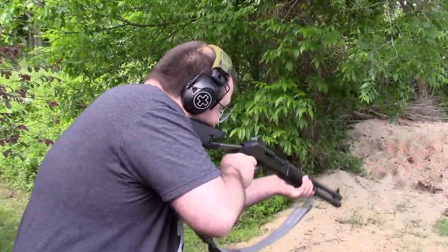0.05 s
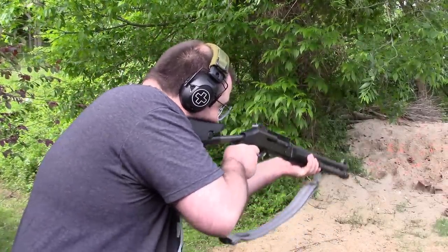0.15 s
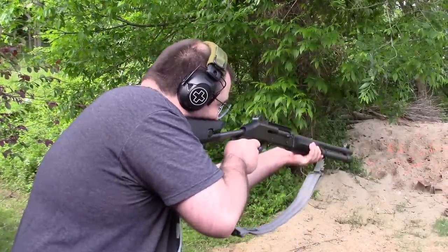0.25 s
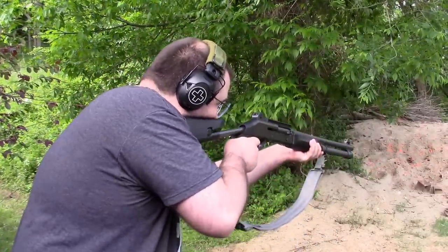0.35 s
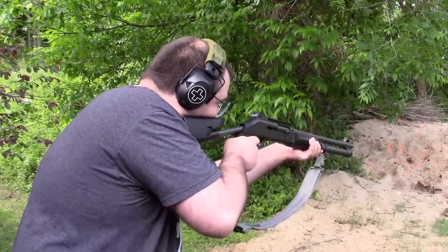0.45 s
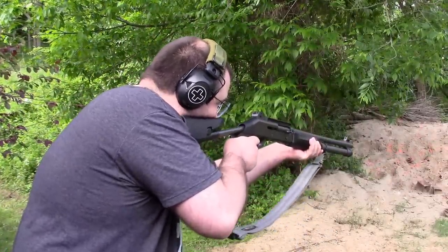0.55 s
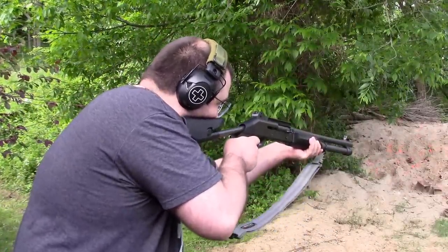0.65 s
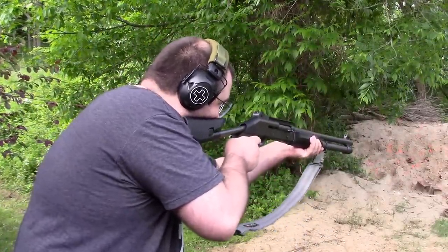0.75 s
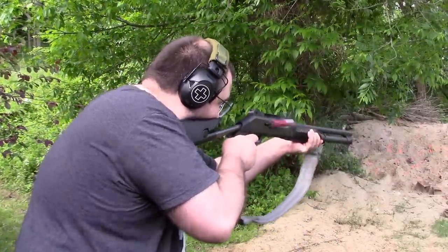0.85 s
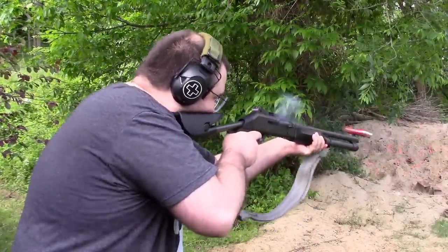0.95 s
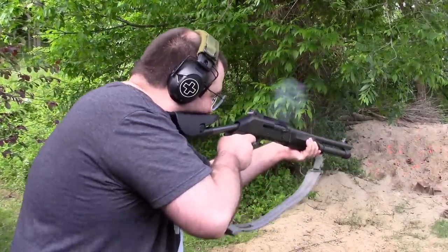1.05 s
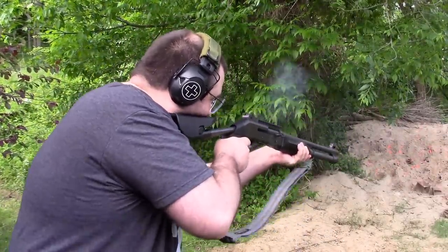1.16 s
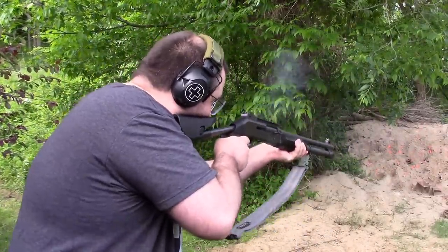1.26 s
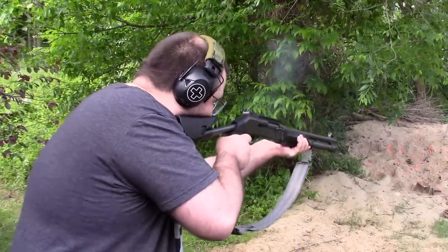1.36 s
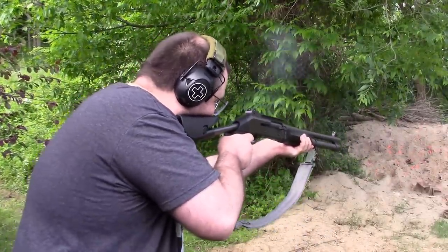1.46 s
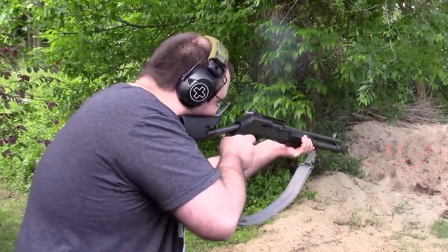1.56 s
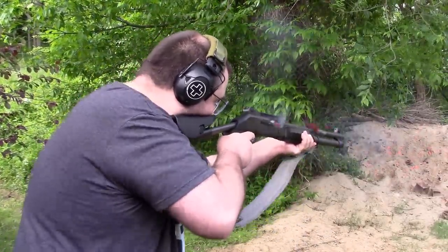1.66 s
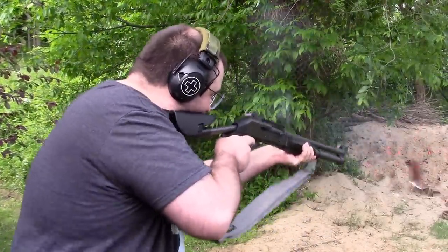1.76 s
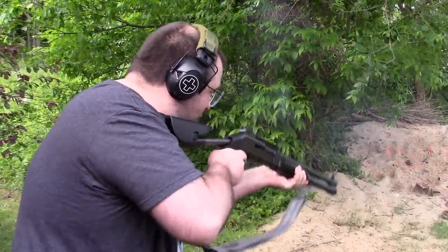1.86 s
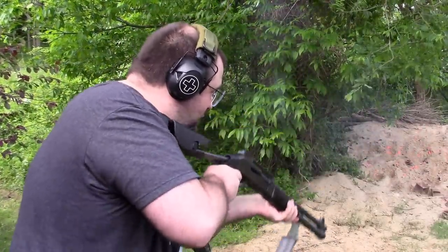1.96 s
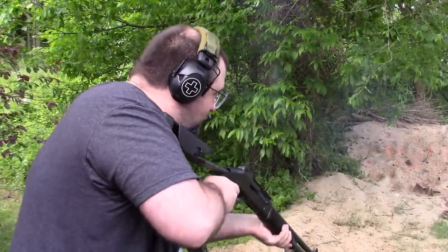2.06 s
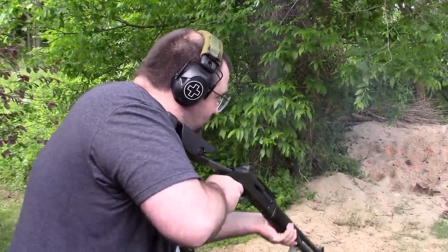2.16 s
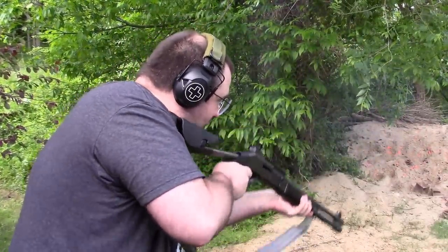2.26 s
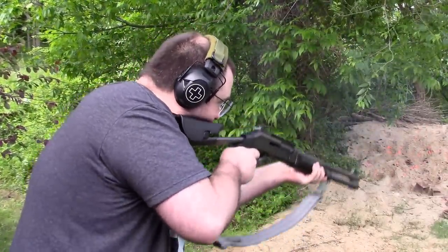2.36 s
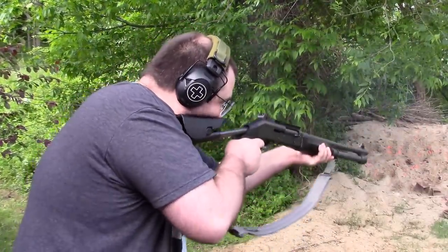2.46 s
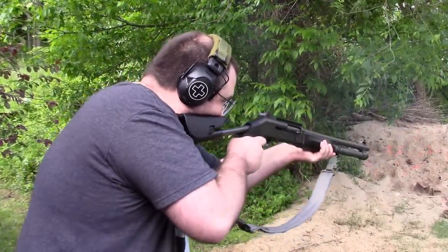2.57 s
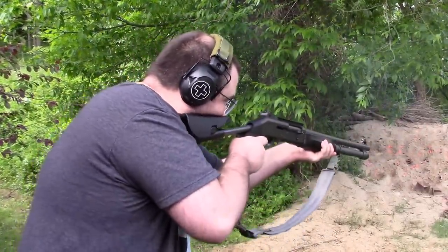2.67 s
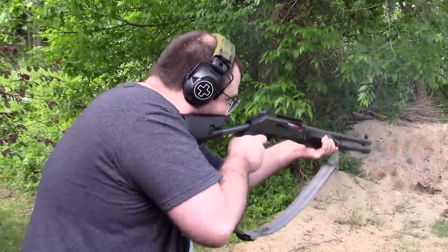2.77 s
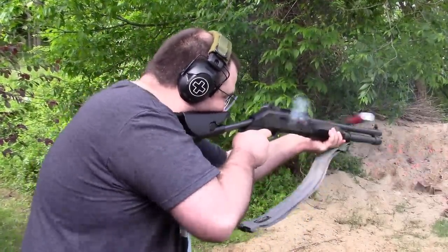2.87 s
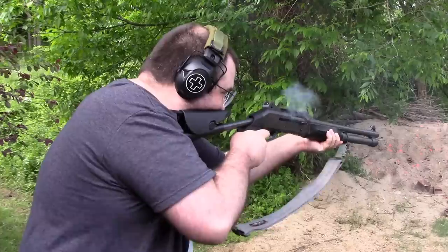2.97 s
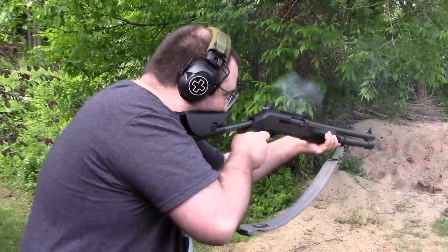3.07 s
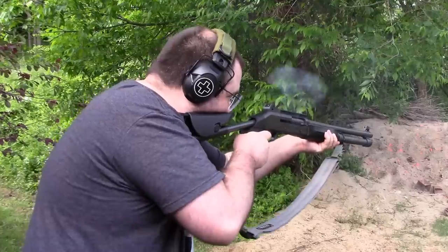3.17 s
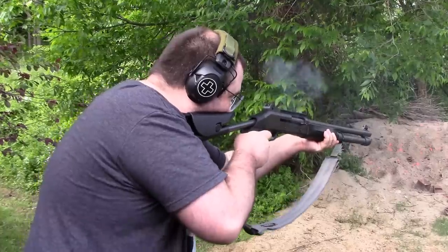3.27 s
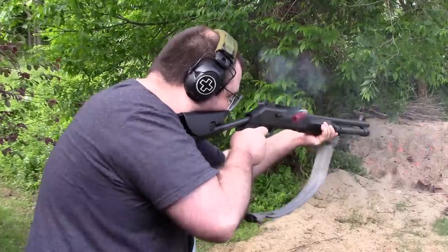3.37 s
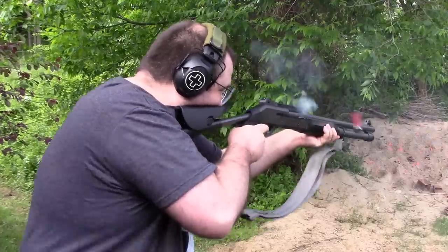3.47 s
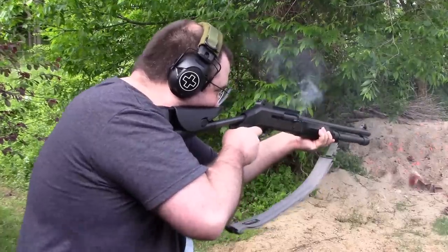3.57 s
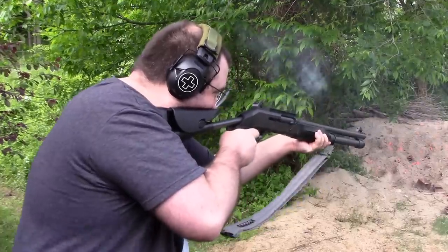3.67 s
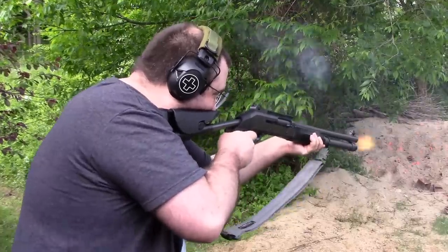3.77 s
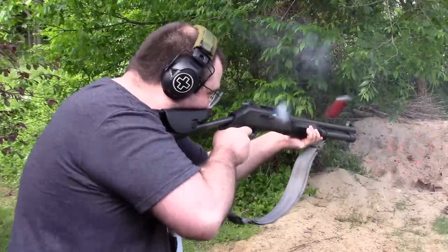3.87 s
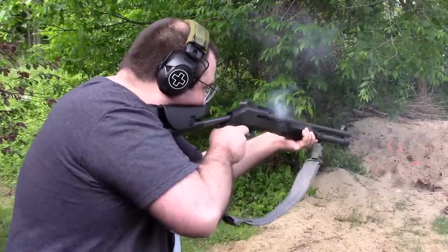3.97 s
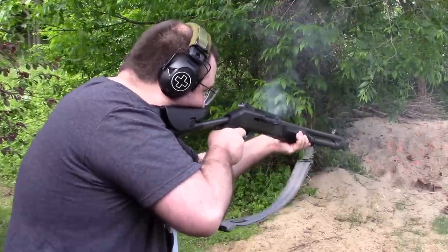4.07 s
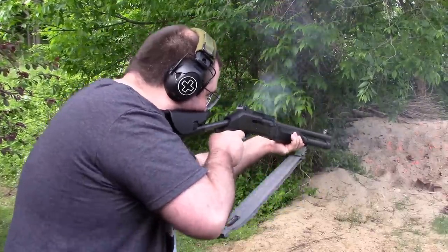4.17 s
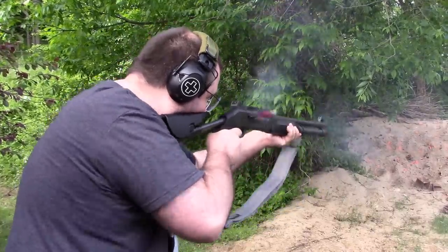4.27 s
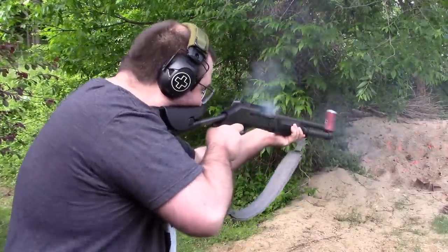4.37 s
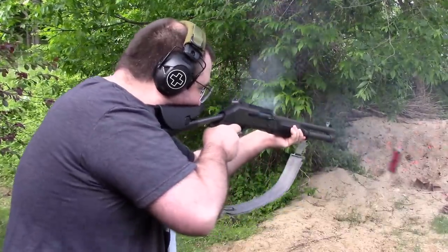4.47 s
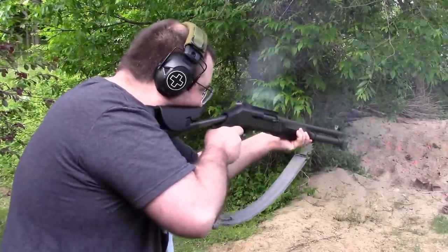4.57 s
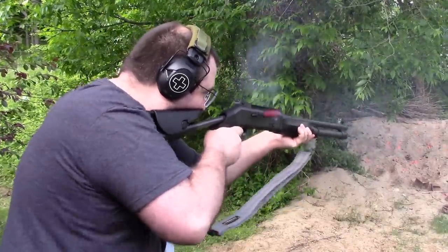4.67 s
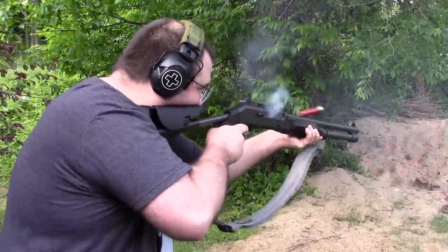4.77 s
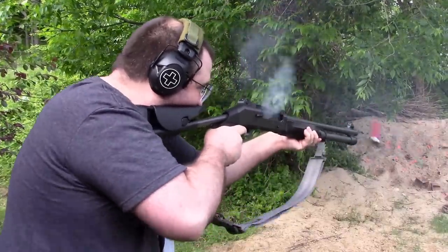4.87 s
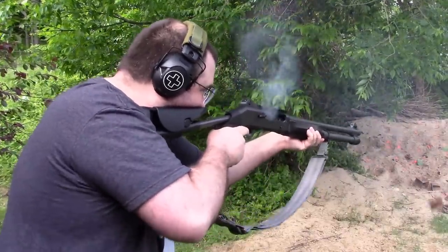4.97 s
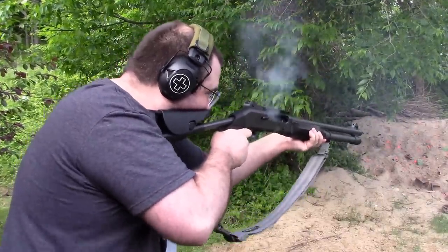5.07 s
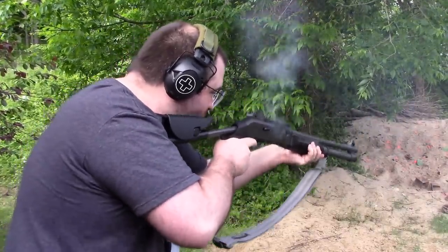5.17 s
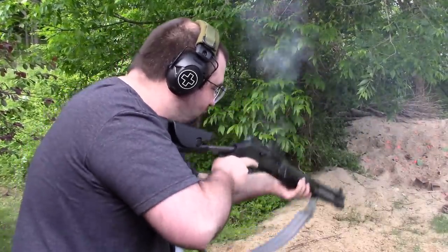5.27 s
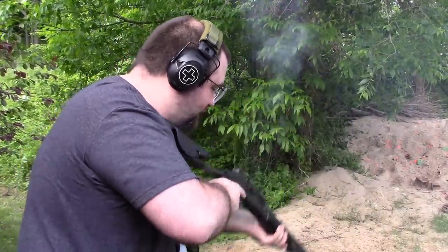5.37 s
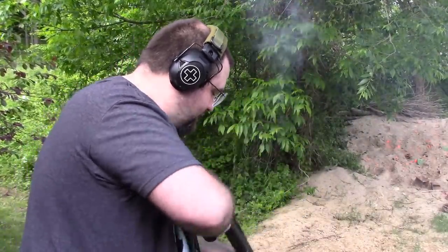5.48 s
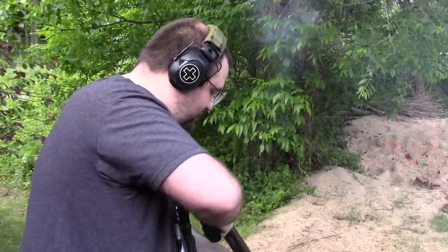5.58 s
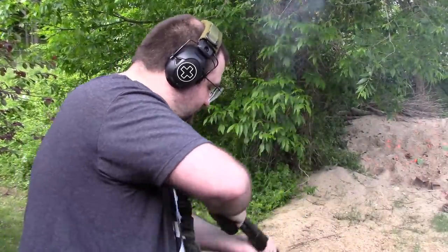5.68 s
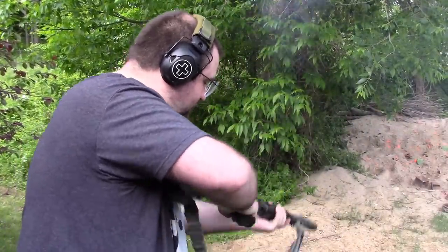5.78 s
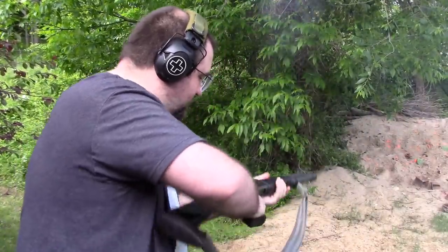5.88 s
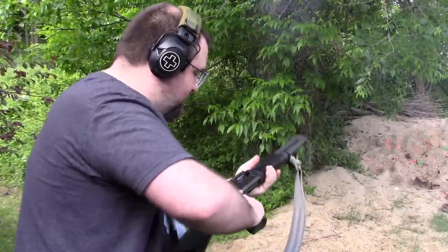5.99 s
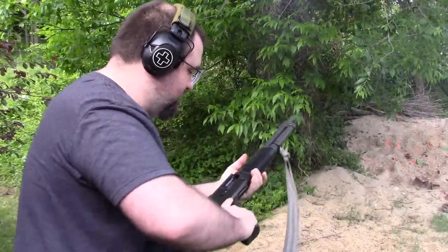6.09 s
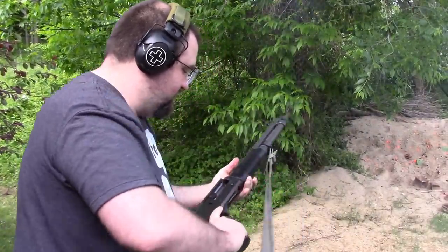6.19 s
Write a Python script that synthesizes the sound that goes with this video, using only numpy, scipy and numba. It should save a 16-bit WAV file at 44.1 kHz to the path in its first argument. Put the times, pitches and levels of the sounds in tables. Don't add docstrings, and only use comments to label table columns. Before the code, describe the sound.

Quiet low air and a faint plane drone, with webbing scraping cloth, then seven loud shotgun blasts close to a camera microphone. The first shots are separated, the last five come about half a second apart. Each cracks, holds as a dense roar thrown back by trunks and banks, and rolls away dully. Metallic bolt snaps and two shell clinks sit between; afterwards, thin rustling and tiny sling ticks.

```python
import sys
import numpy as np
from scipy import signal
from scipy.fft import rfft, irfft, next_fast_len
from scipy.io import wavfile
from scipy.ndimage import uniform_filter1d
from numba import njit

SR = 44100
rng = np.random.default_rng(int(sys.argv[2]) if len(sys.argv) > 2 else 0)


def unload_audio(sound):
    columns = np.transpose(np.atleast_2d(sound))
    steps = np.round(np.clip(columns, -1, 1) * 32767)
    wavfile.write(sys.argv[1], SR, steps.astype(np.int16))


def ratio(d):
    e = np.asarray(d, float) / 20
    return 10 ** e


N = 274743
TIME = np.arange(N) / SR

# start in seconds, how far the gain sags just after it in dB.
SHOTS = [
    (.86, -1),
    (1.6335, -3.5),
    (2.8098, -0.5),
    (3.3691, -2),
    (3.831, -2),
    (4.275, -1.5),
    (4.6981, -2),
]
# pitch in Hz, leak in dB, blast above the echoes in dB, settling in seconds.
MUZZLE = [(150, -42, 9, 0.0017), (600, -33, 7, 0.0017), (2500, -26, 2.5, 0.0092),
          (9000, -21.5, 14.5, 0.015), (15000, -23, 21, 0.025)]
# pitch in Hz, hold level in dB, hold in seconds, fade in dB per second, step at the last trunks in dB.
FOREST = [(150, -25.5, 0.31, 30, -5), (610, -18.5, 0.43, 42, -4), (2590, -20.5, .32, 45.5, -2),
          (9000, -29, 0.069, 58.5, 0.5)]
# pitch in Hz, level in dB.
FOREST_COLOUR = [(40, -24), (90, -10.5), (330, 3.5), (800, -1), (1250, 1), (1700, -2), (4000, 1), (8500, 4)]
# pitch in Hz, level in dB.
MIC_TOP = [(8500, 0), (12000, -8.5), (15500, -28)]
# time after the shot in seconds, half width in seconds, pitch in Hz, change in dB.
CLEARINGS = [(0.13, 0.043, 560, -5), (0.075, 0.034, 2100, -4), (0.303, 0.04, 120, -9),
             (0.27, 0.043, 2300, -4.5), (0.17, 0.054, 56, -10), (0.392, 0.029, 720, -4.5),
             (0.27, 0.088, 1740, 1.5)]
# time in seconds, peak in dB, pitch in Hz.
BANKS = [(.879, -4.5, 390), (.894, -5, 510), (.902, -0.5, 704), (1.066, -4.5, 494), (1.076, 2, 407),
         (1.091, -10, 410), (1.099, 3, 382), (1.122, -15, 350), (1.185, -23, 520), (1.196, -22, 800),
         (1.208, -7.5, 700), (1.2155, -7, 306), (1.2385, 1, 930), (1.2665, 3, 930), (1.284, -6.5, 360),
         (1.2925, -13, 440), (1.2975, -0.5, 470), (1.309, -3, 480), (1.3185, -16, 480), (1.326, -3.5, 414),
         (1.381, -8, 440), (1.401, -7, 1050), (1.4075, -1, 507), (1.447, -11, 503)]
# time in seconds, peak in dB, pitch in Hz.
BOOMS = [(1.065, -26, 150), (1.17, -19, 134), (1.241, -10.5, 250), (1.243, -5.5, 139), (1.247, -15, 90),
         (1.285, -18, 130), (1.34, -18, 129)]
# time after the shot in seconds, level in dB.
HILL = [(.5, -29), (.8, -43), (.88, -29.5), (.93, -38), (1.1, -41), (1.2, -54), (1.35, -49), (1.55, -78)]
# pitch in Hz, level in dB per Hz.
HILL_COLOUR = [(80, -17), (130, 4), (300, -9), (500, 9), (1350, 0.5), (1650, -23.5), (2500, -27),
               (5000, -71)]
# start in seconds, peak in dB.
BOLT = [
    (0.9908, 0.5),
    (1.758, 1),
    (2.9454, 2.5),
    (3.5039, 2),
    (3.9624, 5),
    (4.4006, 0.5),
    (2.979, -9),
]
# pitch in Hz, level in dB, time to fall 60 dB in seconds.
BOLT_MODES = [(5900, -8, .01), (8750, -19, .12), (10100, -12, .02), (14600, -14, .01)]
# start in seconds, peak in dB, crack in dB, brightness in dB per octave.
SHELLS = [
    (2.235, 7, -7, 0.5),
    (3.3336, 2.5, 12, 10),
]
# pitch in Hz, level in dB, time to fall 60 dB in seconds.
SHELL_MODES = [(1220, -4, 0.11), (2280, 1, 0.02), (2530, 2, 0.02), (2950, 0, 0.021), (3320, -4, .02),
               (3670, -6, 0.014), (4050, 2.5, 0.022), (4230, -2, 0.029), (5300, -12, .012),
               (6060, -7, .018), (6860, -8, .018)]
# start in seconds, peak in dB, pitch in Hz.
TICKS = [
    (1.26, -21, 6000),
    (1.3103, -20, 6030),
    (2.5614, -28, 8260),
    (2.6686, -29, 9000),
    (3.7632, -30, 5900),
    (5.38, -15.5, 6400),
    (5.4217, -15, 4130),
    (5.61, -24, 7300),
]
# time in seconds, level in dB.
SLING = [(0, -71), (.1, -61), (.22, -62), (.33, -61), (.4, -79), (.6, -80), (.72, -69), (.85, -58),
         (.9, -90)]
# pitch in Hz, level in dB per Hz.
SLING_COLOUR = [(1200, -16), (1900, -4), (2150, 7), (2500, -4), (2900, 3), (3400, -10), (4100, -7),
                (5500, -26)]
# time in seconds, level in dB.
LEAVES = [(0, -72), (.1, -68), (.45, -90), (1.4, -42), (2.3, -35.5), (2.8, -50), (5.4, -37), (5.7, -45.5),
          (6.23, -48)]
# pitch in Hz, level in dB per Hz.
LEAF_COLOUR = [(2060, -44), (3500, -2), (5310, -2), (5980, 1.5), (9020, -1.5), (10500, -3), (15500, -19)]
# time in seconds, level in dB, lift of the overtones in dB.
PLANE = [(0, -50, -18), (.1, -49, -6), (.3, -45.5, -12), (.5, -44.5, -5), (.85, -42, -2.5),
         (1.6, -29.5, -9.5), (2.8, -48.5, 9), (4, -70, 6)]
# multiple of the blade rate, level in dB.
BLADES = [(1, 1.5), (2, -3), (3, -7), (4, -17), (5, -11), (6, -15), (7, -28), (8, -21), (9, -24)]
# pitch in Hz, level in dB per Hz.
AIR_COLOUR = [(65, -30), (110, -4), (177, -1), (310, -4.5), (500, -8), (1590, -18), (9630, -36),
              (15500, -49)]
# time in seconds, gain in dB, wind guard in octaves above 100 Hz.
RECORDER = [(0, 4, 1.1), (.86, -1.5, 1.1), (1.6, 0.5, 1), (2.2, 0, 1.2), (2.9, -1.5, 0.96),
            (3.149, -7, 1.9), (3.4, -6, 2.28), (4.201, -6.5, 1.34), (4.55, -6, 2.2), (4.75, -3.5, 3.81),
            (4.95, -0.5, 4.29), (5.2, -1.5, 4.44), (5.5, -5, 3.94), (5.8, 0, 3.77), (6.23, -2.5, 2.7)]

LEAK_S = 0.0067
EDGE_S, EDGE_SOFT_S = 0.48, 0.004
KNEE_S, LATE_DB_PER_S = 0.92, 13.5
CLEARING_OCT = 1.46
DUCK_DB, RECOVER_S, SAG_S = 27, 1, 0.1
REBOUND_S, REBOUND_DB = 0.0068, -1
BLADE_HZ = 88.7
CRACK = signal.butter(2, [3000, 9500], "band", fs=SR, output="sos")


def on_log(hz, table):
    f, v = np.transpose(table)
    return np.interp(np.log(hz + 1e-9), np.log(f), v)


def add(out, s, sound):
    i = int(s * SR)
    out[..., i:i + sound.shape[-1]] += sound[..., :out.shape[-1] - i]


def recovered_db(since):
    return -DUCK_DB * np.clip(1 - since / RECOVER_S, 0, 1) * (since >= 0)


def blasts():
    size = next_fast_len(int(1.6 * SR))
    t, hz = TIME[:size], np.fft.rfftfreq(size, 1 / SR) + 1e-9
    same = np.clip(on_log(hz, [(200, .95), (1000, .75), (3000, .2)]), 0, 1)
    side_db = on_log(hz, [(150, -21), (350, -29), (1000, -21), (4000, -17), (8000, -18), (12000, -14)])
    side_gain = ratio(side_db + 1.5)
    bands = []
    for centre in 40 * 2 ** np.arange(0, 9, .5):
        level_db = forest_db(t, centre) + on_log(centre, FOREST_COLOUR) + on_log(centre, MIC_TOP)
        gain = ratio(level_db) * np.sqrt(SR / 2 / (0.21 * centre))
        bands.append((centre, gain))
    fixed = trunks(size, 5000, 1.)
    strong = banks(size)
    out = np.zeros((2, N))
    for k, (s, _) in enumerate(SHOTS):
        wave = same * fixed + np.sqrt(1 - same ** 2) * trunks(size, SR, 1.5)
        wave[1] *= side_gain
        answer = strong + hillside(wave, t, hz)
        for centre, gain in bands:
            band = np.clip(1 - abs(2 * np.log2(hz / centre)), 0, 1)
            answer = answer + gain * irfft(wave * band, size)
        mid, side = answer
        duck_db = sum(recovered_db(t + s - later) for later, _ in SHOTS[k + 1:])
        add(out, s, np.array([mid + side, mid - side]) * ratio(duck_db))
    return out


def forest_db(t, hz):
    def at(table):
        columns = np.array(table)
        return [on_log(hz, columns[:, [0, k]]) for k in range(1, columns.shape[1])]

    hold_db, hold_s, fade, edge_db = at(FOREST)
    leak_db, blast_db, settle_s = at(MUZZLE)
    db = hold_db - fade * (np.clip(t, hold_s, KNEE_S) - hold_s)
    db = db - LATE_DB_PER_S * np.maximum(t - KNEE_S, 0)
    db = db + edge_db * (1 + np.tanh((t - EDGE_S) / EDGE_SOFT_S)) / 2
    db = db + blast_db * np.exp(-np.abs(t - LEAK_S) / settle_s)
    for s, half_s, gap_hz, gap_db in CLEARINGS:
        octaves = np.log2(hz / gap_hz)
        db = db + gap_db * np.exp(-((t - s) / half_s) ** 2 - (octaves / CLEARING_OCT) ** 2)
    return np.where(t < LEAK_S, leak_db, db)


def trunks(size, per_s, lumpy_db):
    x = rng.standard_normal((2, size)) * ratio(lumpy_db * rng.exponential(size=(2, size)))
    x = x * (rng.random((2, size)) < per_s / SR)
    return rfft(x / x.std())


def pulse(hz, cycles):
    t = np.arange(-2 * cycles, 2 * cycles, hz / SR)
    return np.exp(-2 * (2 * t / cycles) ** 2) * np.cos(2 * np.pi * t + 1.0)


def banks(size):
    out = np.zeros((2, size))
    for rows in (BANKS, BOOMS):
        for s, peak_db, hz in rows:
            p = ratio(peak_db) * pulse(hz, 3.)
            off_centre = .07 * rng.standard_normal()
            add(out, s - SHOTS[0][0] - len(p) / SR / 2, np.outer([1, off_centre], p))
    return out


def hillside(wave, t, hz):
    far = irfft(wave * ratio(on_log(hz, HILL_COLOUR)), len(t))
    return far / far[0].std() * ratio(np.interp(t, *np.transpose(HILL), left=-99))


def ring(modes, crack_db, crack_s):
    t = TIME[:SR // 4]
    y = ratio(crack_db) * signal.sosfilt(CRACK, rng.standard_normal(len(t))) * np.exp(-t / crack_s)
    for hz, db, t60 in modes:
        size, phase = rng.standard_normal(2)
        y = y + ratio(db + 1.5 * size - 60 * t / t60) * np.sin(2 * np.pi * hz * t + phase)
    return y / np.abs(y).max()


def bolt(out):
    for s, db in BOLT:
        for late_s, late_db in ((0, 0), (REBOUND_S, REBOUND_DB)):
            add(out, s + late_s, ratio(db + late_db) * ring(BOLT_MODES, 8., .003))


def shells(out):
    for s, db, crack_db, tilt_db in SHELLS:
        modes = []
        for hz, mode_db, t60 in SHELL_MODES:
            modes.append((hz, mode_db + tilt_db * np.log2(hz / SHELL_MODES[3][0]), t60))
        add(out, s, ratio(db) * ring(modes, crack_db, .003))


def sling_ticks(out):
    for s, db, hz in TICKS:
        modes = [(hz, 0, .006), (1.45 * hz, -2, .005), (2.1 * hz, -2, .005)]
        add(out, s, ratio(db) * ring(modes, 4., .0012))


def metal():
    out = np.zeros(N)
    bolt(out)
    shells(out)
    sling_ticks(out)
    t = TIME[:SR // 5]
    mid, side = rng.standard_normal((2, len(t))) * ratio(-37.0 - 60 * np.abs(t - .02) / 0.1)
    smear = mid + 0.34 * side * np.array([[1], [-1]])
    return out + signal.fftconvolve(out[None], smear, axes=1)[:, :N]


def coloured(table, side_db):
    gain = ratio(on_log(np.fft.rfftfreq(N, 1 / SR), table))
    mid, side = irfft(rfft(rng.standard_normal((2, N))) * gain, N)
    return (mid + ratio(side_db) * side * np.array([[1], [-1]])) / mid.std()


def sling():
    return coloured(SLING_COLOUR, -18.0) * ratio(np.interp(TIME, *np.transpose(SLING), right=-99))


def leaves():
    return coloured(LEAF_COLOUR, -11.0) * ratio(np.interp(TIME, *np.transpose(LEAVES)))


def plane():
    s, db, lift_db = np.transpose(PLANE)
    out = 0
    for k, (_, line_db) in enumerate(BLADES, 1):
        waver = uniform_filter1d(np.repeat(rng.standard_normal(N // 4000 + 1), 4000), 4000)[:N]
        lift = np.interp(TIME, s, lift_db) * (k > 1)
        level_db = line_db - BLADES[0][1] + lift + 1.7 * waver * np.sqrt(k)
        out = out + ratio(level_db) * np.sin(2 * np.pi * k * BLADE_HZ * TIME + k ** 2)
    return np.sqrt(2) * out * ratio(np.interp(TIME, s, db))


def air():
    return coloured(AIR_COLOUR, -12.0) * ratio(-56.5 + 3.0)


def scene():
    calm = sling() + leaves() + plane() + air()
    duck_db = sum(recovered_db(TIME - s) for s, _ in SHOTS)
    return blasts() + metal() + calm * ratio(duck_db)


@njit
def low_cut(x, hz):
    y, low = np.empty(len(x)), 0.
    for i in range(len(x)):
        low += (1 - np.exp(-2 * np.pi * hz[i] / SR)) * (x[i] - low)
        y[i] = x[i] - low
    return y


def low_pass(x):
    return signal.sosfilt(signal.butter(12, 15850, fs=SR, output="sos"), x)


def record(dry):
    s, gain_db, guard = np.transpose(RECORDER)
    sag_db = 0
    for shot, db in SHOTS:
        since = np.maximum(TIME - shot, 0) / SAG_S
        sag_db = sag_db + db * since * np.exp(1 - since)
    corner_hz = 100 * 2 ** np.interp(TIME, s, guard)
    x = np.array([low_cut(c, corner_hz) for c in dry])
    x = x * ratio(np.interp(TIME, s, gain_db) + sag_db)
    x = x / (1 + np.abs(x / .97) ** 4) ** .25
    x = signal.sosfilt(signal.butter(1, 60, "high", fs=SR, output="sos"), x)
    x = signal.sosfilt(signal.ellip(10, .2, 60, 15800, fs=SR, output="sos"), x)
    return low_pass(x)


dry = scene()
out = record(dry)
unload_audio(out)
```